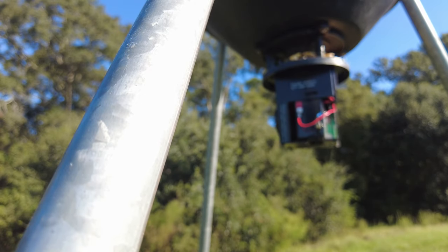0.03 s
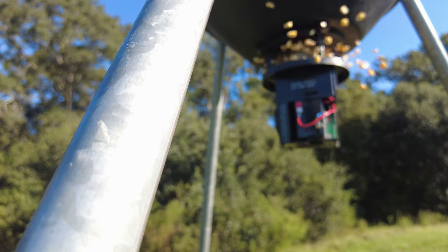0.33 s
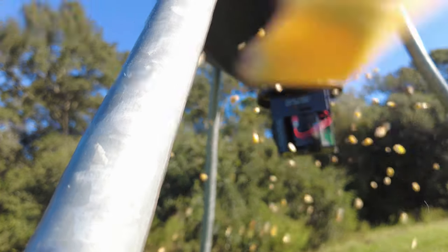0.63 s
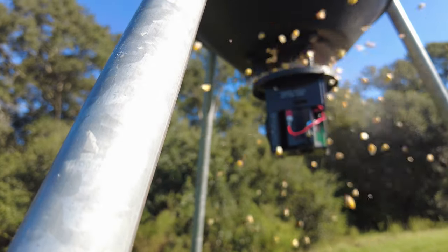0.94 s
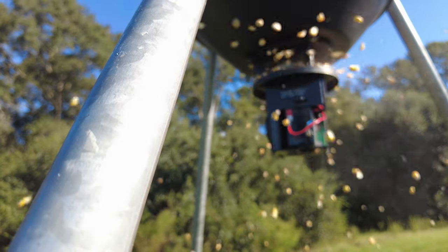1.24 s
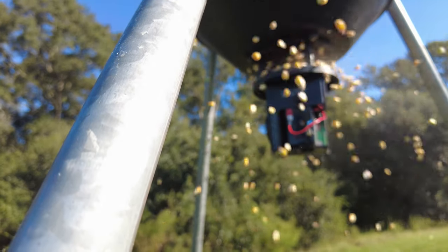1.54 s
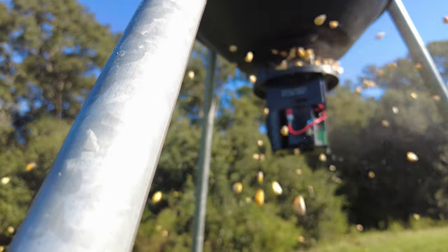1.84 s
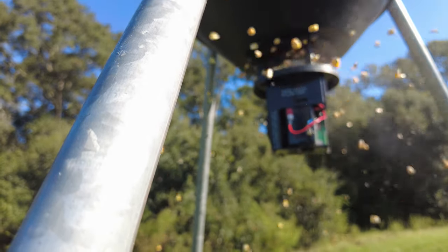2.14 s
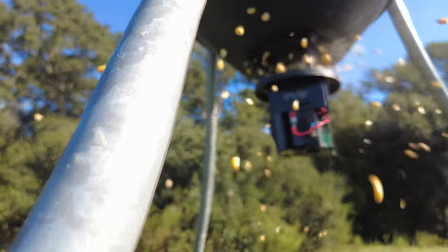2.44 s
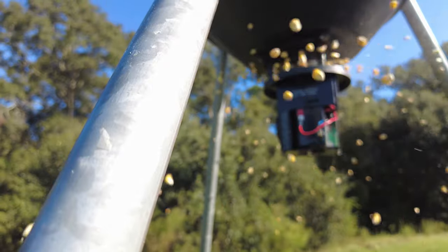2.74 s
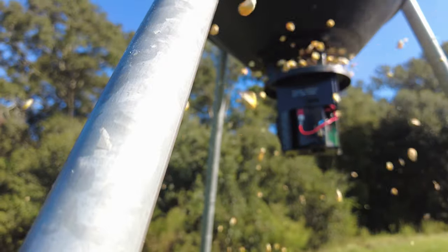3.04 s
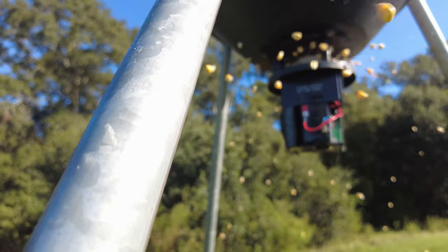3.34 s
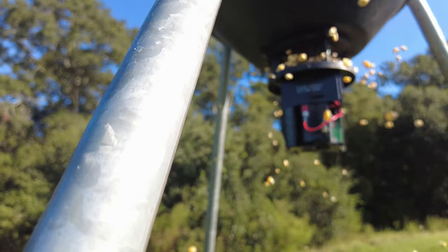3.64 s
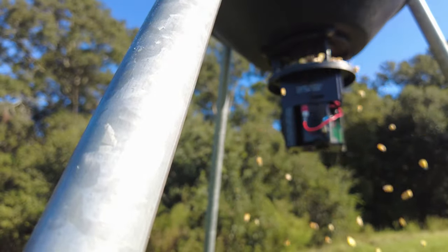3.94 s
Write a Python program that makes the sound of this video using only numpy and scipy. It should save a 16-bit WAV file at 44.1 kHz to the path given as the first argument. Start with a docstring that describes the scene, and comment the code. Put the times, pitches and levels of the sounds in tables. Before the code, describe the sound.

Corn rattles hard against a motorised feeder's spinning metal plate for three seconds, then trails off.

```python
"""Corn cracks against the spinner plate and housing of a motorised feeder, close to a phone outdoors.
The feeder spins up under its hopper, flings corn for three seconds and runs down. Each impact is an
impulse that excites the resonances of the metal; hundreds a second merge into a rattle, while stray
kernels hit the hopper and legs or land nearby. Insects and a faint hum lie underneath, the tree line
scatters a dull wash back, and wind buffets the microphone towards the end."""
import sys
import numpy as np
from scipy import signal
from scipy.fft import rfft, irfft
from scipy.io import wavfile
from scipy.ndimage import map_coordinates

SR = 44100
rng = np.random.default_rng(int(sys.argv[2]) if len(sys.argv) > 2 else 0)


def store_pcm(level_fs):
    """Save levels as 16-bit WAV."""
    pcm = np.round(np.clip(level_fs, -1, 1) * 32767).astype(np.int16)
    wavfile.write(sys.argv[1], SR, np.atleast_2d(pcm).T)


N = 176400


def undb(db):
    """Decibels to amplitude ratio."""
    return 10 ** (np.asarray(db) / 20)


def unit(x):
    """Normalisation to an rms of 1."""
    return x / np.sqrt(np.mean(x ** 2))


def curve(rows):
    """Linear interpolation between rows of time in seconds and value."""
    return np.interp(np.arange(N) / SR, *np.array(rows).T)


def walk(hz):
    """Smooth random modulation: a spline through hz values a second, with a spread near 1."""
    knots = rng.standard_normal(N // 100)
    return 1.2 * map_coordinates(knots, [np.arange(N) / SR * hz], order=3, mode="wrap")


def colour(x, outline, peaks=()):
    """Minimum-phase filtering by a broad spectral outline plus resonance peaks."""
    size = 8192
    f = np.fft.rfftfreq(size, 1 / SR) + 1
    hz, db = np.array(outline).T
    power = undb(np.interp(np.log(f), np.log(hz), db)) ** 2
    for centre, width, peak_db in peaks:
        power = power + undb(peak_db) ** 2 / (1 + ((f - centre) / width) ** 2 * 2) ** 2
    cepstrum = irfft(np.log(power) / 2)
    cepstrum[1:size // 2] *= 2  # folding the cepstrum makes the filter causal
    cepstrum[size // 2 + 1:] = 0
    return signal.fftconvolve(x, irfft(np.exp(rfft(cepstrum))))[:len(x)]


def noise(outline):
    """White noise filtered to a spectral outline, with an rms of 1."""
    return unit(colour(rng.standard_normal(N), outline))


def resonate(x, hz, width_hz):
    """A second-order resonator with a gain of 1 at its centre."""
    return signal.lfilter(*signal.iirpeak(hz, hz / width_hz, fs=SR), x)


def treble(x, hz):
    """Zero-phase high-pass filtering above hz."""
    f = np.fft.rfftfreq(len(x), 1 / SR)
    return irfft(rfft(x) * (1 - 1 / (1 + (f / hz) ** 8)), len(x))


def burst(t60_s):
    """Dense damped modes: noise of unit energy that decays by 60 dB in t60_s."""
    t = np.arange(SR // 10) / SR
    ring = rng.standard_normal(len(t)) * np.exp(-np.log(1000) * t / t60_s)
    return ring / np.linalg.norm(ring)


def blows(per_s, scatter_db):
    """A Poisson train of uneven impacts, scaled so that mean power is independent of rate."""
    struck = rng.random(N) < per_s / SR
    return struck * undb(scatter_db * np.minimum(rng.standard_normal(N), 2)) / np.sqrt(per_s)


def outdoors(hum_hz=285):
    """Insects trill as an amplitude-modulated noise band over quiet air and a far, wavering hum."""
    # Each row of both spectra: frequency in Hz, relative level in dB.
    insect_spectrum = [(7000, -37), (8100, -16), (8700, -4), (9500, 0), (10100, -6), (10500, -25),
                       (12000, -42)]
    air_spectrum = [(50, 3.5), (150, -22.5), (400, -7), (1000, -17), (3000, -21), (7000, -29), (16000, -32)]
    insects = noise(insect_spectrum) * undb(-61.5 + 1.5 * walk(hz=33))
    pitch_hz = hum_hz * (1 + 0.0038 * walk(hz=6.06))
    hum = np.sqrt(2) * np.sin(2 * np.pi * np.cumsum(pitch_hz) / SR)
    return undb(-59.5) * noise(air_spectrum) + insects + undb(-65) * hum


def wind(eddy_hz=160, eddy_width_hz=91, strong_gust_db=-19.5):
    """Turbulent pressure on the microphone rumbles, flutters in strong gusts and thumps a few times."""
    # Each row: time in seconds, rumble level in dB.
    gusts = [(0, -35), (.2, -43.5), (.55, -51.5), (.8, -47), (1.5, -51), (2, -46.5), (2.5, -48), (2.6, -36),
             (2.69, -38), (2.75, -31.5), (2.85, -32), (3.1, -27.5), (3.25, -20.5), (3.55, -23),
             (3.635, -27), (3.69, -20), (3.78, -25), (3.86, -23.5), (4, -20)]
    # Each row: frequency in Hz, relative level in dB.
    rumble_spectrum = [(8, -4.5), (25, 3), (45, -2), (70, -5.5), (140, -18), (220, -34.5), (400, -41),
                       (1000, -55), (4000, -80)]
    # Each row: time in seconds, peak level in dB, frequency in Hz, half length in seconds.
    buffets = [(2.726, -17.5, 37, 0.0098), (3.345, -22.5, 111, 0.0036), (3.677, -9.5, 87, 0.0033),
               (3.682, -20, 182, .004)]
    t = np.arange(N) / SR
    gust_db = curve(gusts)
    eddies = resonate(rng.standard_normal(N), eddy_hz, eddy_width_hz)
    eddies = unit(resonate(eddies, eddy_hz, 2 * eddy_width_hz))
    eddy_db = -37.5 + 1.8 * np.minimum(gust_db - strong_gust_db, 0)  # grows faster than the rumble
    thumps = sum(undb(db) * np.exp(-.5 * ((t - at) / length) ** 2) * np.cos(2 * np.pi * hz * (t - at))
                 for at, db, hz, length in buffets)
    return noise(rumble_spectrum) * undb(gust_db) + eddies * undb(eddy_db) + thumps


def corn_flow():
    """The flow of corn modulates the rattle's level in dB: the motor's run, clumps and quick flutter."""
    # Each row: time in seconds, level in dB.
    run = [(.26, -81), (.295, -45.5), (.312, -33.5), (.335, -32), (.345, -24.5), (.41, -22), (.46, -18),
           (.8, -18), (1.1, -16), (1.4, -16.5), (1.8, -17.5), (2.15, -17), (2.45, -16), (2.9, -16.5),
           (3.3, -15.5), (3.36, -20.5), (3.5, -25), (3.595, -28), (3.63, -38.5), (3.67, -34.5),
           (3.745, -36), (3.81, -41), (3.87, -39), (4, -45)]
    # Clumps and gaps leaving the hopper. Each row: time in seconds, level change in dB.
    clumps = [(.499, 1.5), (.63, 0), (.665, 2.5), (0.734, -2.5), (.869, 2), (.972, 0), (1.251, -4),
              (1.306, 3.5), (1.495, 4), (1.724, 1), (1.875, 4), (1.955, 2.5), (1.99, -2), (2.209, 2),
              (2.51, 1), (2.602, -2.5), (2.678, -2), (2.732, 3.5), (2.83, -1), (2.924, 1), (3.156, 1),
              (3.216, 1)]
    t = np.arange(N) / SR
    half_length_s = 0.015
    clump_db = sum(db * np.exp(-.5 * ((t - at) / half_length_s) ** 2) for at, db in clumps)
    return curve(run) + clump_db + 0.7851 * walk(hz=44.95)


def kernel_cracks(density, per_s=1500, spots=24):
    """Superposition of impacts: each spot on the spinner has its own impulse response, crack plus ring."""
    cracks = 0
    for _ in range(spots):
        response = burst(t60_s=0.0039) + undb(1) * burst(t60_s=0.05)
        impacts = blows(per_s * density / spots, scatter_db=0.5)
        cracks = cracks + signal.oaconvolve(impacts, response)[:N]
    return cracks


def feeder_body(cracks):
    """The modes of plate, housing and hopper filter the impacts."""
    # Each row: frequency in Hz, relative level in dB.
    crack_spectrum = [(100, -27.5), (300, -32.5), (650, -20.5), (1300, -27.5), (2600, 1), (4700, -6),
                      (6500, -0.5), (8700, -3.5), (10700, -8), (12500, -6), (13900, -4), (14700, -8.5),
                      (15600, -7)]
    # Each row: resonance frequency in Hz, width in Hz, relative level in dB.
    modes = [(369.6, 63, -10.5), (515, 54, -15.5), (886, 132, -2), (994, 53, -10), (1158, 70, -8.5),
             (1414, 76, -11.5), (1654, 370, -0.5), (1950, 126, -2), (2240, 52, 2), (2450, 164, -3),
             (2740, 163, 2), (3350, 200, -0.5), (3810, 150, -2), (4080, 133, 0), (5280, 206, 0.5),
             (6220, 730, -1.5), (7620, 480, 1.5)]
    return unit(colour(cracks, crack_spectrum, modes))


def plate_ring(cracks, hz=2872, width_hz=152):
    """Forced vibration: the impacts drive one narrow plate mode, which swells and fades."""
    # Each row: time in seconds, level in dB relative to the feeder's body.
    levels = [(.3, -24), (.7, -25), (1.05, -14), (1.55, -9.5), (1.9, -22), (2.3, -11.5), (2.85, -11),
              (3.3, -13.5), (3.7, -27.5)]
    ring = resonate(resonate(cracks, hz, width_hz), hz, width_hz)
    return undb(curve(levels)) * unit(ring)


def rim_pings(density, per_s=170, t60_s=0.018):
    """Glancing kernels each excite one damped mode of the metal rim."""
    # Each entry: mode frequency in Hz.
    pitches = [2360, 3640, 5250, 5640, 5970, 6420, 7950, 8070]
    width_hz = np.log(1000) / np.pi / t60_s
    rate = per_s * density / len(pitches)
    return unit(sum(resonate(blows(rate, scatter_db=4.5), hz, width_hz) for hz in pitches))


def contact_clicks(density, per_s=140):
    """Brief contact gives a wide spectrum: bare clicks of kernels, heard in the treble."""
    clicks = signal.oaconvolve(blows(per_s * density, scatter_db=4.5), burst(t60_s=.0015))[:N]
    return unit(treble(clicks, hz=6000))


def motor_drone():
    """The running motor drones as narrow-band noise."""
    return unit(resonate(rng.standard_normal(N), hz=141, width_hz=29))


def rattle():
    """The feeder's sounds add under one envelope; the treble falls as the last kernels slow down."""
    # Each row: time in seconds, treble gain in dB.
    shelf = [(.27, -2.5), (.4, 1), (3.3, 2), (3.59, 1), (3.64, 0.5), (3.72, 2), (3.8, -0.5), (4, -6)]
    flow_db = corn_flow()
    density = np.maximum(undb(flow_db - np.median(flow_db)) ** 0.5, .15)  # impact rate, 1 at median flow
    cracks = kernel_cracks(density)
    mix = feeder_body(cracks) + plate_ring(cracks)
    mix += undb(-9) * rim_pings(density)
    mix += undb(-19) * contact_clicks(density)
    mix += undb(-38.5) * motor_drone()
    feeder = unit(mix) * undb(flow_db)
    return feeder + (undb(curve(shelf)) - 1) * treble(feeder, hz=9400)


def strikes(rows, spectrum, t60_s):
    """Single impacts decay freely as coloured rings, with a contact click where the row gives one."""
    out = np.zeros(N + SR)
    for at, db, *click in rows:
        ring = burst(t60_s)
        ring[0] += sum(click)
        hit = colour(ring, spectrum)
        hit *= np.sqrt(SR / 100) / np.linalg.norm(hit)  # the energy of 10 ms at an rms of 1
        start = int(at * SR)
        out[start:start + len(hit)] += undb(db) * hit
    return out[:N]


def hopper_knocks():
    """Stray kernels set the hopper and legs into briefly damped vibration."""
    # Each row: start in seconds, relative level in dB.
    knocks = [(.271, -53), (.34, -35), (1.007, -23.5), (1.050, -17), (1.223, -24.5), (1.296, -19),
              (1.353, -16.5), (1.488, -20), (1.550, -23), (1.722, -18.5), (2.844, -28), (3.406, -26),
              (3.509, -21), (3.655, -27), (3.712, -27), (3.737, -29), (3.772, -33), (3.882, -35),
              (3.958, -37)]
    # Each row: frequency in Hz, relative level in dB.
    spectrum = [(200, -19), (600, -13), (950, 7.5), (1300, -1), (2200, 3.5), (4000, -1), (9000, -33),
                (16000, -36)]
    return undb(-3.5) * strikes(knocks, spectrum, t60_s=0.03)


def near_ticks():
    """Hard impacts near the microphone are short and therefore broad in spectrum."""
    # Each row: start in seconds, relative level in dB, size of the click relative to the ring.
    ticks = [(.272, -55, .3), (.9705, -14, 0.43), (1.1137, -15.5, 0.5), (1.3382, -20, .7),
             (1.469, -15.5, 0.44), (1.7089, -20.5, 0.45), (1.8635, -17.5, .2), (1.8685, -24, .2),
             (1.8745, -28, .2), (1.877, -14.5, .4), (1.954, -11, 0.34), (2.0172, -15, 0.41),
             (2.4916, -18.5, .7), (2.7026, -22, .7), (2.815, -16, .2), (2.9964, -20, .7), (3.1536, -16, .7),
             (3.5085, -25.5, 2.3), (3.7702, -16, 2.4), (3.848, -37, 0.22)]
    # Each row: frequency in Hz, relative level in dB.
    spectrum = [(200, -19), (1000, -8), (3000, -2.5), (4200, 2), (6000, -5), (8500, -0.5), (12000, -5),
                (16000, 0)]
    return undb(-1.5) * strikes(ticks, spectrum, t60_s=0.0067)


def landing_thuds():
    """Kernels land close by in dull impacts whose energy lies at low frequencies."""
    # Each row: start in seconds, relative level in dB.
    thuds = [(.772, -33.5), (1.953, -33), (2.162, -24.5), (2.750, -29.5), (2.781, -35), (2.960, -24),
             (3.024, -30), (3.077, -30), (3.508, -24), (3.772, -30), (3.860, -33.5)]
    # Each row: frequency in Hz, relative level in dB.
    spectrum = [(80, -38), (250, -4), (480, -0.5), (750, 0), (1500, -3), (5000, -38), (16000, -64)]
    return undb(-3) * strikes(thuds, spectrum, t60_s=0.08)


def trees(x, t60_s=1.5, delay_s=0.042):
    """Diffuse scattering from the tree line returns a faint, dull, delayed wash."""
    # Each row: frequency in Hz, relative level in dB.
    spectrum = [(200, -5), (1000, -2), (2500, -0.5), (5000, -2.5), (8000, -8), (15000, -18)]
    t = np.arange(N) / SR
    onset = np.clip(t / delay_s - 1, 0, 1)
    echo = colour(rng.standard_normal(N), spectrum) * np.exp(-np.log(1000) * t / t60_s) * onset
    return undb(-20) * signal.fftconvolve(x, echo / np.linalg.norm(echo))[:N]


def scene():
    """All pressures add at one microphone, the same in both channels."""
    corn = rattle() + hopper_knocks() + near_ticks() + landing_thuds()
    return np.tile(corn + trees(corn) + wind() + outdoors(), (2, 1))


def record(dry):
    """The phone clips at full scale and limits the bandwidth with a steep low-pass filter."""
    top_hz = 15750
    low_pass = signal.ellip(12, .1, 80, top_hz, fs=SR, output="sos")
    return signal.sosfilt(low_pass, np.clip(dry, -1, 1))


dry = scene()
out = record(dry)
store_pcm(out)
```